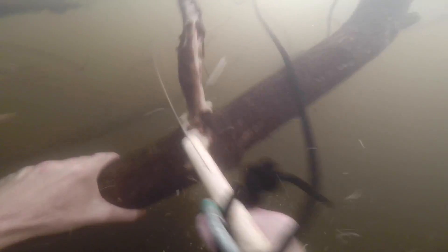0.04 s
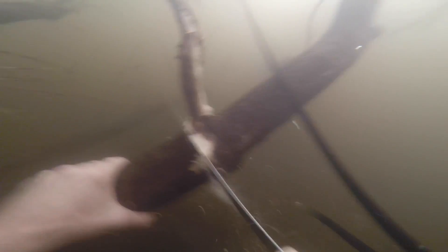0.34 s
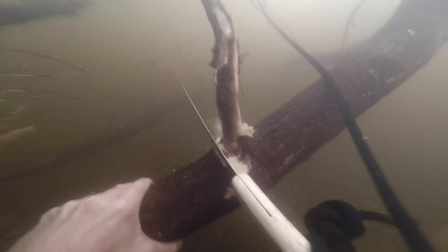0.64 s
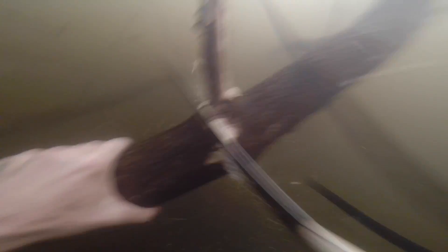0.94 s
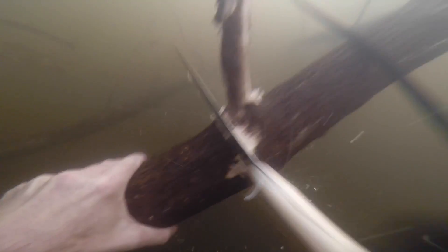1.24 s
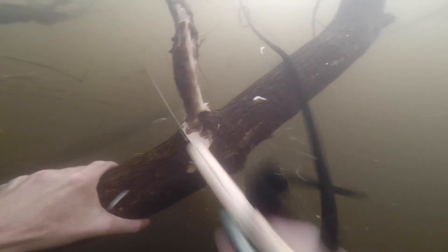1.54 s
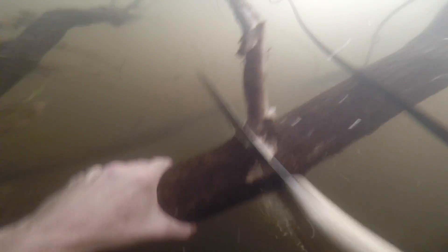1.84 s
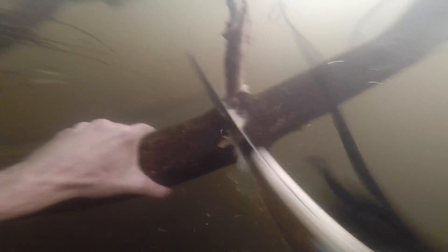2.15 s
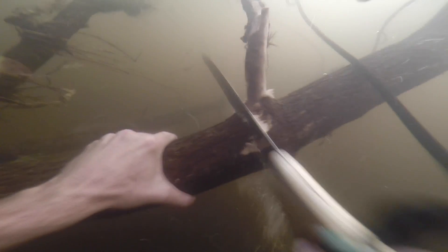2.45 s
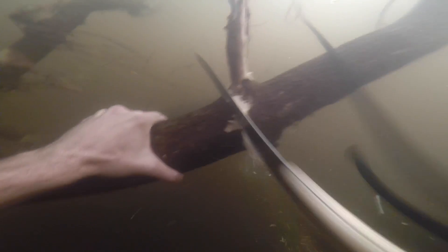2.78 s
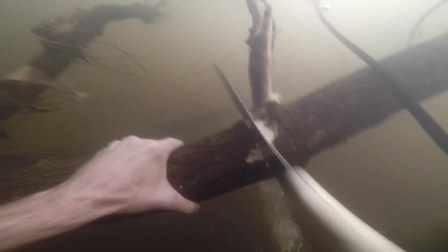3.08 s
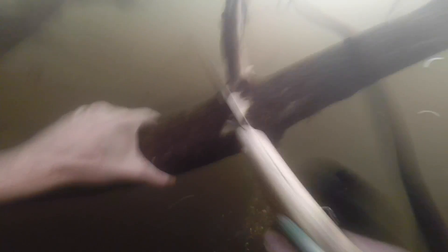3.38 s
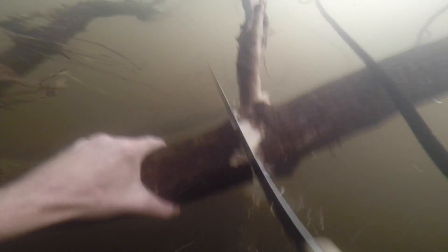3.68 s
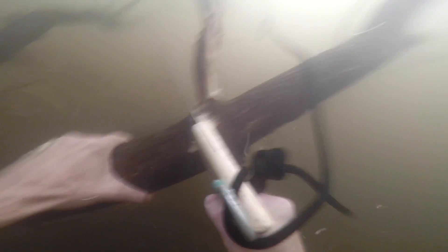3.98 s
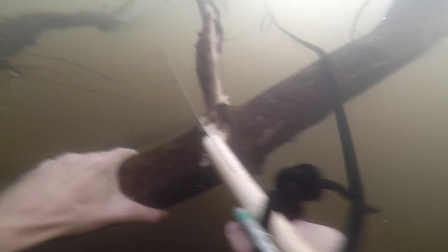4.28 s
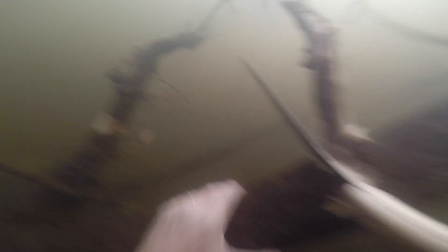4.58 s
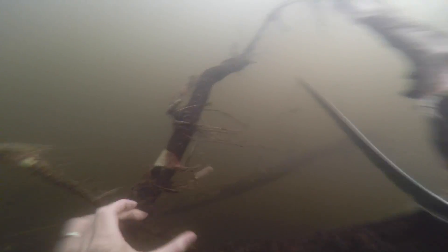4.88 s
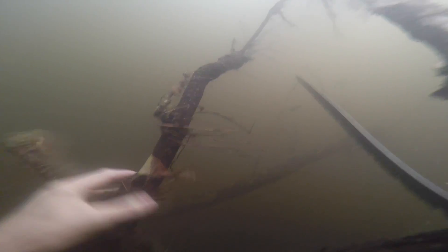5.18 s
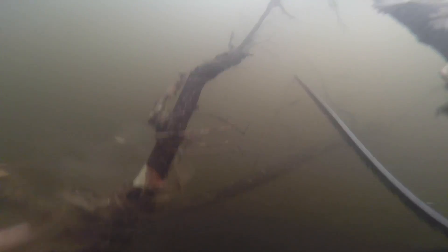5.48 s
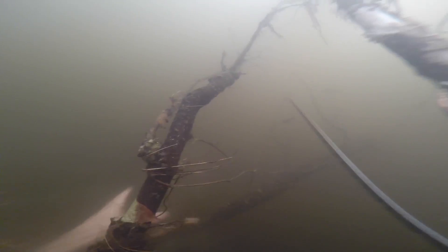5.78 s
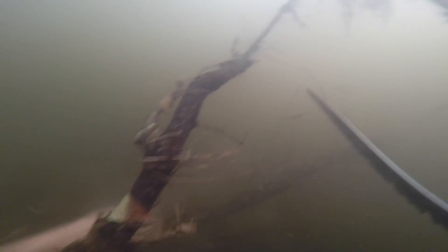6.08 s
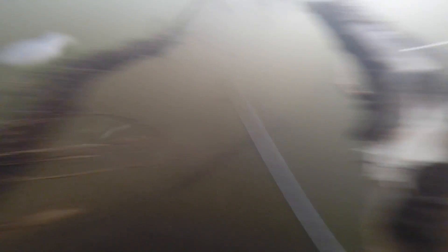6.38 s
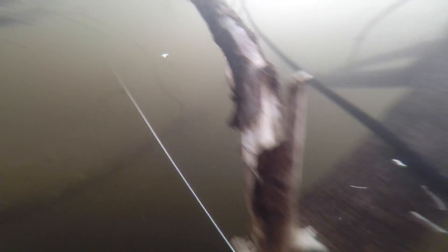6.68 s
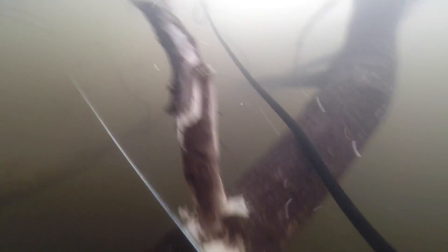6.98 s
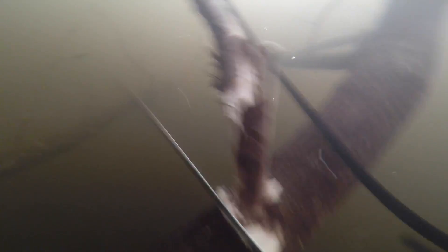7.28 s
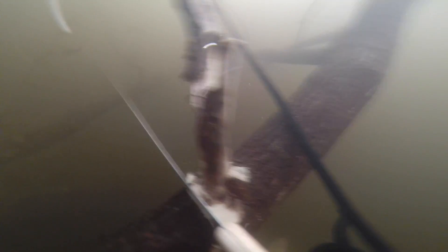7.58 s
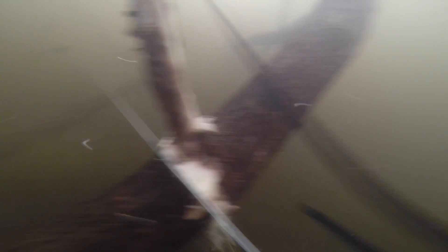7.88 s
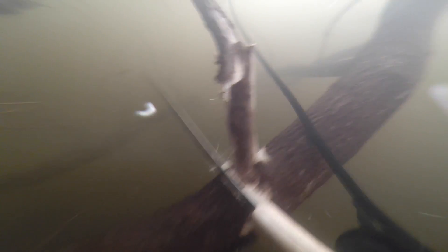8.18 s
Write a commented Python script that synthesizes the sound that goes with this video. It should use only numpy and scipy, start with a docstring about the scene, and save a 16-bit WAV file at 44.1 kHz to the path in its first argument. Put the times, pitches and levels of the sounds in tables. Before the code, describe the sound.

A hand saw rasps through a branch underwater, pauses for small snaps and knocks, then resumes amid churning water and bubbles.

```python
"""Rasping saw strokes under water: a curved hand saw cuts a branch close to a camera housing.
On hard pulls and lighter pushes the teeth tear fibres, ring the steel, grind the wood and shake
the branch; the blade judders and squeaks where it binds. In a pause a hand shifts the branch,
splinters snap, bubbles pop and the housing is bumped. Water churns throughout, over faint
hiss and whine from the electronics."""
import sys
import numpy as np
from scipy import signal
from scipy.fft import rfft, irfft, next_fast_len
from scipy.io import wavfile
from scipy.ndimage import uniform_filter1d, map_coordinates

SR = 44100
rng = np.random.default_rng(int(sys.argv[2]) if len(sys.argv) > 2 else 0)


def materialize(psi):
    """Save the field psi as 16-bit PCM at rate SR to the path in sys.argv[1].

    A 1-D psi becomes a single channel; in a 2-D psi each row is a channel.
    """
    bounded = np.clip(np.atleast_2d(psi).T, -1, 1)
    quanta = np.round(bounded * 32767).astype(np.int16)
    wavfile.write(sys.argv[1], SR, quanta)


N = 372204

# Strokes: (start [s], length [s], hardest bite [share of length], blade rasp [dB], tooth hiss [dB],
# wood grind [dB], branch shake [dB], water surge [dB])
PULL_STROKES = [ (0.196, 0.2, 0.64, -31.5, -30, -25, -24.5, -22.5),
                (0.908, 0.2, 0.48, -30.5, -30.5, -21.5, -17.5, -24.5),
                (1.598, 0.19, 0.32, -34.5, -33.5, -23.5, -21.5, -29),
                (2.135, 0.22, 0.54, -33, -31, -24, -19, -22.5),
                (2.769, 0.19, 0.54, -31.5, -29.5, -23.5, -22.5, -21.5),
                (3.395, 0.25, 0.37, -34, -32, -24, -14.5, -21.5),
                (7.069, 0.14, 0.44, -41, -42.5, -29.5, -27.5, -27),
                (7.419, 0.11, 0.62, -37.5, -43, -28, -18, -20.5),
                (7.821, 0.188, 0.37, -34.5, -33, -22.5, -11, -33), ]
PUSH_STROKES = [ (-0.1, 0.24, 0.54, -36.5, -38.5, -28.5, -21.5, -24.5),
                (0.472, 0.22, 0.68, -37, -41.5, -29, -20, -27),
                (0.75, 0.084, 0.64, -51.5, -54, -41, -53, -51),
                (1.21, 0.22, 0.67, -33, -39, -26.5, -18.5, -30),
                (1.825, 0.22, 0.74, -38.5, -41, -30.5, -24.5, -37),
                (2.397, 0.22, 0.59, -36, -39.5, -30, -21.5, -28),
                (3.03, 0.25, 0.77, -34.5, -37, -28, -24, -45), (3.732, 0.32, 0.28, -36, -40, -29, -23, -28),
                (8.067, 0.19, 0.67, -36, -42, -30, -22.5, -36), ]
# Envelopes of rasp, hiss, grind, shake, surge, a row each:
# (peak lag after hardest bite [share of length], sharpness [exponent], overrun [s])
PULL_ENVELOPES = [ (0.12, 0.75, 0.001), (0.028, 1.07, 0.002), (0.13, 0.95, 0.0088), (0.15, 1.68, 0.015),
                  (-0.28, 0.8, 0.053), ]
PUSH_ENVELOPES = [ (-0.073, 0.79, 0.0044), (0.0043, 0.94, 0.001), (-0.11, 0.61, 0.0059),
                  (-0.37, 1.13, 0.0034), (-0.086, 0.45, 0.047), ]


def amp(db):
    """Decibels to gain."""
    return 10 ** (np.asarray(db) / 20)


def unit(x):
    """Scale to rms 1."""
    return x / np.sqrt(np.mean(x ** 2) + 1e-20)


def clock(length_s):
    """Sample times over a duration."""
    return np.arange(max(int(length_s * SR), 2)) / SR


def add(track, start_s, sound):
    """Mix a sound in; it may start before time 0."""
    start = round(start_s * SR)
    sound = sound[max(-start, 0):]
    part = track[max(start, 0):][:len(sound)]
    part += sound[:len(part)]


def level(points):
    """Gain per sample from (time [s], level [dB]) points."""
    return amp(np.interp(np.arange(N) / SR, *np.transpose(points)))


def swell(length_s, peak_share, sharpness):
    """Arch from 0 to 1 and back."""
    turn = np.interp(clock(length_s) / length_s, [0, np.clip(peak_share, .1, .9), 1], [0, .5, 1])
    return np.abs(np.sin(np.pi * turn)) ** abs(sharpness)


def stroke_gains(rows, envelopes):
    """Gains of rasp, hiss, grind, shake and surge; one arch each per stroke."""
    out = np.zeros((len(envelopes), N))
    for start_s, length_s, hardest, *levels_db in rows:
        for track, db, (lag, sharpness, overrun_s) in zip(out, levels_db, envelopes):
            add(track, start_s, amp(db) * swell(length_s + overrun_s, hardest + lag, sharpness))
    return out


def wobble(rate_hz):
    """Smooth random curve with knots at rate_hz."""
    knots = rng.standard_normal(int(N * rate_hz / SR) + 4)
    return map_coordinates(knots, [np.arange(N) * rate_hz / SR])


def filtered(x, response):
    """Apply a frequency response."""
    m = next_fast_len(N + 8192)
    return irfft(rfft(x, m) * response(np.fft.rfftfreq(m, 1 / SR)), m)[:N]


def noise(spectrum):
    """Shaped noise, rms 1."""
    f, db = np.transpose(spectrum)
    white = rng.standard_normal(N)
    return unit(filtered(white, lambda hz: amp(np.interp(np.log(hz + 1), np.log(f), db))))


def impulses(rate_hz, spread_db):
    """Tiny snaps of uneven size at random times."""
    hits = rng.random(N) < rate_hz / SR
    return hits * rng.standard_normal(N) * amp(spread_db * rng.standard_normal(N))


def resonate(x, modes, low_hz, high_hz):
    """x rings a body that radiates between two frequencies; rms 1."""
    f = np.linspace(1, SR / 2, num=4096)
    body = sum(amp(db) * 1j * f * width / (hz * hz - f * f + 1j * f * width) for hz, width, db in modes)
    body = body / (1 + (low_hz / f) ** 8) / (1 + (f / high_hz) ** 8)
    return unit(filtered(x, lambda hz: np.interp(hz, f, body)))


def pings(rows, attack_cycles, glide, gain_db):
    """Damped sines that bend in pitch as they die."""
    out = np.zeros(N)
    for start_s, db, hz, t60_s in rows:
        t = clock(1.5 * t60_s)
        phase = 2 * np.pi * hz * t * (1 + glide * t / t60_s)
        ring = np.sin(phase) * amp(-60 * t / t60_s) * (1 - np.exp(-t * hz / attack_cycles))
        add(out, start_s, amp(db + gain_db) * ring / np.abs(ring).max())
    return out


def electronics():
    """The camera's own hiss and thin whine."""
    # Hiss spectrum: (frequency [Hz], density [dB])
    hiss = [(1500, 7.5), (3000, 3.5), (7000, -5), (10200, -1.5), (11000, -7.5), (13000, -15.5),
            (14600, -12), (15200, -28)]
    # Whine tones: (frequency [Hz], level [dB])
    whine = [(5844, -80.5), (8781, -86.5), (11718, -77), (14625, -85.5)]
    t = np.arange(N) / SR
    return amp(-61.5) * noise(hiss) + sum(amp(db) * np.sin(2 * np.pi * hz * t) for hz, db in whine)


def water():
    """Strokes push water against the housing in lumps, under a soft wash and dull taps."""
    # Stirring between strokes, and wash: (time [s], level [dB])
    churn_levels = [(0, -34), (3.9, -29.5), (4.2, -37), (5.3, -43), (5.9, -39), (6.7, -42), (7.4, -34.5),
                    (8.44, -25.5)]
    wash_levels = [(0, -49), (3.9, -48), (4.2, -56), (4.6, -53), (5.3, -52.5), (6.1, -56), (6.6, -50.5),
                   (7.4, -46.5), (8.44, -48)]
    # Water spectra: (frequency [Hz], density [dB])
    surge_spectrum = [(10, -18), (22, 1), (45, 1), (70, -2), (100, -11.5), (140, -18), (200, -28.5),
                      (400, -50), (800, -100)]
    wash_spectrum = [(88, -36.5), (150, 10), (670, 3), (1080, -11), (1170, -10), (1640, -11.5),
                     (3040, -20.5), (4760, -27), (6000, -26), (7800, -45.5), (13200, -120)]
    pull_surge = stroke_gains(PULL_STROKES, PULL_ENVELOPES)[-1]
    push_surge = stroke_gains(PUSH_STROKES, PUSH_ENVELOPES)[-1]
    surge = np.hypot(level(churn_levels), pull_surge + push_surge)
    lumps = unit(noise(surge_spectrum) * amp(3.3 * wobble(9)))
    hits = impulses(rate_hz=25, spread_db=2.5)
    taps = resonate(hits, [(260, 300, -1), (600, 280, 0)], low_hz=120.4, high_hz=1020)
    wash = noise(wash_spectrum) * amp(0.73 * wobble(40))
    return amp(-1) * surge * lumps + level(wash_levels) * (amp(-2.5) * wash + amp(-10) * taps)


def fizz(centre_hz, t60_cycles, spread_db, count):
    """Small bubbles escape from the wood; the smaller, the higher and shorter."""
    # Bubble strength: (time [s], level [dB])
    fizz_levels = [(0, -42.5), (2.7, -47), (3.7, -43), (4.9, -54.5), (5.4, -59), (6.8, -60), (7.6, -47),
                   (8.44, -67)]
    start_s = rng.random(count) * N / SR
    smallness, strength = np.clip(rng.standard_normal((count, 2)), -2, 2).T
    hz = centre_hz * 2 ** (.6 * smallness)
    db = np.interp(start_s, *np.transpose(fizz_levels)) + spread_db * strength - 2 * smallness
    rows = np.transpose([start_s, db, hz, t60_cycles / hz])
    return pings(rows, attack_cycles=.5, glide=0.052, gain_db=-7)


def fragments(parents, centre_hz, spread_s, offset_db, t60_cycles, count):
    """Each large bubble sheds a gritty burst of small ones."""
    parent_s, parent_db = np.repeat(np.array(parents)[:, :2], count, axis=0).T
    delay, smallness, strength = np.clip(rng.standard_normal((len(parent_s), 3)), -2, 2).T
    hz = centre_hz * 2 ** (1.02 * smallness)
    db = parent_db + offset_db + 3 * (strength - smallness)
    rows = np.transpose([parent_s + spread_s * np.abs(delay), db, hz, t60_cycles / hz])
    return pings(rows, attack_cycles=0.28, glide=0.068, gain_db=2.5)


def bubbles():
    """Large bubbles ring with rising pitch and shed fragments."""
    # Pops: (time [s], level [dB], pitch [Hz], t60 [s])
    pops = [(2.098, -44, 1480, 0.04), (2.283, -26.5, 1030, 0.021), (2.314, -18.5, 1230, 0.02),
            (2.334, -24, 990, 0.044), (2.362, -26.5, 628, 0.11), (2.626, -26, 405, 0.064),
            (2.638, -38, 1250, 0.016), (2.681, -42.5, 1436, 0.094), (2.702, -44.5, 3800, 0.019),
            (3.004, -40.5, 3080, 0.027), (3.669, -21.5, 674, 0.016), (3.672, -31, 1180, 0.012),
            (3.677, -19.5, 615, 0.022), (3.682, -35, 1800, 0.017), (4.6613, -20.5, 390, 0.048),
            (5.638, -20, 391, 0.038), (7.691, -33, 1115, 0.033), (8.35, -39, 1020, 0.014)]
    shed = fragments(pops, centre_hz=1710, spread_s=.009, offset_db=-18.5, t60_cycles=4.1, count=8)
    return pings(pops, attack_cycles=0.35, glide=0.057, gain_db=2.5) + shed


def handling():
    """Bark scrapes against the hand, twigs against the blade."""
    # Rubs: (start [s], length [s], bark [dB], twigs [dB])
    rubs = [(4.665, 0.08, -50, -65), (4.825, 0.061, -49, -58), (4.88, 0.24, -57.5, -69),
            (5.134, 0.29, -59.5, -77), (5.501, 0.044, -58, -63), (5.715, 0.165, -48.5, -80),
            (6.513, 0.041, -48.5, -62), (6.7, 0.16, -65, -66)]
    # Resonances: (frequency [Hz], width [Hz], level [dB])
    bark_modes = [(686, 73, 12.5), (1450, 91, 6), (1800, 240, -12), (2320, 140, -4), (3750, 250, -12)]
    twig_modes = [(2650, 320, -12), (4070, 700, 1), (6200, 450, -1)]
    bark_gain, twig_gain = np.zeros((2, N))
    for start_s, length_s, bark_db, twig_db in rubs:
        rub = swell(length_s, peak_share=0.27, sharpness=1)
        add(bark_gain, start_s, amp(bark_db) * rub)
        add(twig_gain, start_s, amp(twig_db) * rub)
    grit = impulses(rate_hz=2500, spread_db=1) * amp(2.3 * wobble(60))
    bark = resonate(grit, bark_modes, low_hz=348, high_hz=7200)
    twigs = resonate(grit, twig_modes, low_hz=2200, high_hz=8000)
    return bark_gain * bark + twig_gain * twigs


def splinters(decay_s, crack_gain, gain_db):
    """Each snap is a brief ring plus a crack of noise, dulled by the housing."""
    # Snaps: (time [s], level [dB], ring [Hz], crack cut-off [Hz])
    snaps = [(0.899, -35, 1470, 2380), (2.1, -47, 1500, 3000), (2.976, -37, 1340, 3000),
             (4.662, -24, 1800, 1900), (4.666, -34.5, 2350, 2600), (4.8215, -44, 1410, 4040),
             (4.931, -46, 2700, 3000), (4.966, -38, 1800, 2520), (5.035, -44.5, 2700, 3500),
             (5.274, -44, 2320, 2500), (5.372, -47, 1900, 2500), (5.442, -45, 1450, 10980),
             (5.637, -33, 1840, 2600), (5.641, -38, 2410, 2400), (6.525, -50, 1510, 3000),
             (6.925, -43.5, 4790, 4970), (7.602, -42, 2250, 3000)]
    out, t = np.zeros(N), clock(.03)
    for start_s, db, hz, cutoff_hz in snaps:
        lowpass = signal.butter(3, min(cutoff_hz / SR * 2, .9))
        crack = signal.lfilter(*lowpass, rng.standard_normal(len(t)))
        ring = np.sin(2 * np.pi * hz * t) * (1 - np.exp(-t * hz))
        add(out, start_s, amp(db + gain_db) * (ring + crack_gain * crack) * np.exp(-t / decay_s))
    return out


def bumps(cutoff_hz):
    """Dull knocks of hand and tool on the housing."""
    # Knocks: (time [s], level [dB], pitch [Hz], t60 [s])
    knocks = [(0.495, -22, 500, 0.014), (0.611, -21.5, 575, 0.023), (0.891, -25, 434, 0.0067),
              (1.860, -25.5, 460, 0.0079), (2.281, -15.5, 258, 0.02), (2.338, -15, 258, 0.06),
              (2.383, -21.5, 397, 0.02), (3.7085, -19, 368, 0.014), (3.730, -17.5, 332, 0.0098),
              (4.3265, -19, 203, 0.028), (4.3335, -20.5, 211, 0.035), (4.836, -40, 900, 0.035),
              (4.844, -30.5, 227, 0.026), (5.503, -28.5, 75, 0.05), (6.072, -24, 243, 0.021),
              (6.346, -30, 225, 0.013), (6.456, -40, 480, 0.008), (6.502, -33, 420, 0.0039),
              (6.6997, -21, 503, 0.0047), (6.734, -27, 430, 0.0025), (6.9165, -17.5, 610, 0.0063),
              (6.918, -24.5, 140, 0.027), (6.9595, -25.5, 564, .011), (7.274, -34.5, 680, 0.016),
              (7.5108, -3, 195, 0.02), (7.686, -32.5, 268, 0.028), (7.748, -21, 80, 0.059),
              (7.846, -1, 96, 0.018), (8.243, -9.5, 130, 0.029)]
    rings = pings(knocks, attack_cycles=0.25, glide=-0.046, gain_db=1.5)
    return filtered(rings, lambda hz: 1 / (1 + (hz / cutoff_hz) ** 4))


def flares(phase_step_hz):
    """One blade mode sings out briefly, its phase wandering."""
    # Mode swells: (start [s], length [s], pitch [Hz], level [dB])
    mode_swells = [(0.221, 0.064, 4500, -29), (1.618, 0.062, 10000, -38.5), (2.213, 0.024, 6400, -24),
                   (2.8, 0.055, 4550, -33.5), (3.429, 0.048, 4600, -33), (3.46, 0.078, 6230, -25.5),
                   (7.863, 0.033, 6340, -28)]
    out = np.zeros(N)
    for start_s, length_s, hz, db in mode_swells:
        t = clock(length_s)
        knots_s = np.arange(0, length_s + 1 / phase_step_hz, 1 / phase_step_hz)
        phase = np.interp(t, knots_s, np.cumsum(rng.standard_normal(len(knots_s))))
        add(out, start_s, amp(db) * np.sin(np.pi * t / length_s) * np.sin(2 * np.pi * hz * t + phase))
    return out


def stick_slip(rows, overtone_db, waver, sharpness):
    """The blade catches and lets go: short glides with an unsteady period and a lopsided wave."""
    out, drift = np.zeros(N), rng.standard_normal((len(rows), 12))
    for (start_s, length_s, first_hz, last_hz, db), knots in zip(rows, drift):
        progress = clock(length_s) / length_s
        detune = 1 + waver * np.interp(progress, np.linspace(0, 1, len(knots)), knots)
        hz = (first_hz + (last_hz - first_hz) * progress) * detune
        phase = 2 * np.pi * np.cumsum(hz) / SR
        wave = np.sin(phase) + amp(overtone_db) * np.sin(2 * phase)
        add(out, start_s, amp(db) * np.abs(np.sin(np.pi * progress)) ** sharpness * wave)
    return out


def moving_contact(x, depth_db):
    """Neighbouring modes swell and sink at random as the contact point moves."""
    spectra = signal.stft(x, nperseg=512)[2]
    field = uniform_filter1d(rng.standard_normal(spectra.shape), size=6, axis=0)
    field = uniform_filter1d(field, size=9, axis=1)
    return unit(signal.istft(spectra * amp(depth_db * unit(field)), nperseg=512)[1][:N])


def slide(x, rows, bend):
    """The blade's free length changes along a stroke and bends its resonances."""
    t = np.arange(N) / SR
    position = sum(np.interp(t, [start_s, start_s + length_s], [-1, 1], left=0, right=0)
                   for start_s, length_s, *_ in rows)
    return map_coordinates(x, [np.cumsum(1 + bend * position)], order=5, mode="mirror")


def strokes(rows, envelopes, catch_db, bend, bright_hz, rough_db, rasp_db, hiss_db, grind_db, shake_db):
    """Teeth tear fibres in uneven bites that ring the steel, grind the wood and shake the branch."""
    # Resonances: (frequency [Hz], width [Hz], level [dB])
    blade_modes = [(1407, 128, 12), (1810, 190, 0), (2288, 286, 0), (2530, 110, -3.5), (2725, 120, -3),
                   (3170, 88, -4.5), (3815, 400, 1), (4506, 250, 1)]
    tooth_modes = [(5800, 120, -5.5), (6345, 510, 2.5), (7000, 220, -13.5), (8220, 780, -15),
                   (9460, 704, -22.5), (10110, 300, -10.5), (11580, 670, -33), (13000, 580, -31.5)]
    wood_modes = [(241, 48, -17.5), (353, 180, -1), (450, 42, -6), (540, 63, -3), (613, 33, 3.5),
                  (677, 43, 2), (690, 24, -3.5), (911, 70, -2)]
    # Branch sway: (frequency [Hz], density [dB])
    sway_spectrum = [(25, -36), (50, -11), (85, 0.5), (120, 0.5), (150, 2.5), (190, -7), (260, -12.5),
                     (500, -46.5), (1000, -100)]
    rasp, hiss, grind, shake, _ = stroke_gains(rows, envelopes)
    roughness_db = rough_db * (wobble(260) + 1.1 * wobble(70))
    hardness_db = wobble(18)  # harder and softer wood
    bite = amp(roughness_db + hardness_db + catch_db)
    blade = resonate(bite * impulses(30000, spread_db=0.5), blade_modes, low_hz=1393, high_hz=4740)
    blade = moving_contact(blade, depth_db=2.5)
    teeth = resonate(bite * impulses(20000, spread_db=1.5), tooth_modes, low_hz=5800, high_hz=bright_hz)
    teeth = moving_contact(teeth, depth_db=4.5)
    wood = resonate(bite * impulses(1500, spread_db=-0.5), wood_modes, low_hz=174, high_hz=798)
    return (amp(rasp_db) * rasp * slide(blade, rows, bend / 2)
            + amp(hiss_db) * hiss * slide(teeth, rows, bend)
            + amp(grind_db) * grind * wood
            + amp(shake_db) * shake * noise(sway_spectrum))


def saw():
    """The saw cuts on the pull, where each judder drives the teeth in harder once a cycle."""
    # Steel catching and binding in the wet cut: (start [s], length [s], first [Hz], last [Hz], level [dB])
    judders = [(0.24, 0.096, 34.7, 42, -15.5), (1.005, 0.059, 103, 94, -6.5),
               (1.268, 0.023, 125, 115, -15.5), (1.872, 0.028, 147, 134, -19.5),
               (2.19, 0.094, 48.7, 56.8, -11.5), (2.785, 0.088, 48, 56, -14),
               (3.08, 0.044, 155, 136.9, -18), (3.44, 0.12, 34.6, 71.7, -7), (3.76, 0.031, 146, 129.4, -14),
               (7.87, 0.11, 74.5, 75, -9)]
    squeaks = [(1.657, 0.018, 710, 584, -6.5), (1.670, 0.012, 734, 610, -1.5), (1.711, 0.02, 500, 408, -5),
               (2.295, 0.019, 608, 576, -16), (2.314, .009, 610, 630, -12.5), (2.330, 0.0072, 614, 544, -8),
               (2.906, 0.0052, 610, 600, -12.5)]
    judder = stick_slip(judders, overtone_db=-7.5, waver=.03, sharpness=0.78)
    squeak = stick_slip(squeaks, overtone_db=-25.5, waver=0.064, sharpness=0.35)
    catch_db = -7 * judder
    pull = strokes(PULL_STROKES, PULL_ENVELOPES, catch_db, bend=0.02073, bright_hz=14900,
                   rough_db=1.57, rasp_db=2.5, hiss_db=0.5, grind_db=0.5, shake_db=-0.5)
    push = strokes(PUSH_STROKES, PUSH_ENVELOPES, catch_db=0, bend=-0.013, bright_hz=12620,
                   rough_db=0.84, rasp_db=0, hiss_db=0.5, grind_db=-0.5, shake_db=-3.5)
    return pull + push + judder + squeak + flares(phase_step_hz=1300) * amp(catch_db)


def scene():
    """All sources summed at one microphone."""
    air = bubbles() + fizz(centre_hz=2107, t60_cycles=33, spread_db=3, count=500)
    impacts = bumps(cutoff_hz=1300) + splinters(decay_s=0.0032, crack_gain=1.57, gain_db=-1)
    return (saw() + air + impacts + handling() + water() + electronics())[None]


def record(dry):
    """Soft clip, then band limit."""
    top_hz = 15350
    rounded = dry[0] / (1 + np.abs(dry[0]) ** 8) ** (1 / 8)
    return filtered(rounded, lambda hz: hz < top_hz)[None]


dry = scene()
out = record(dry)
materialize(out)
```